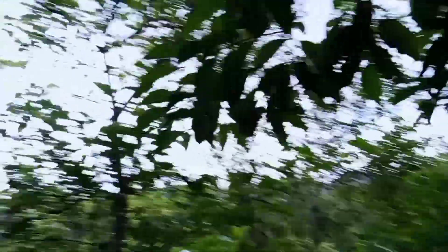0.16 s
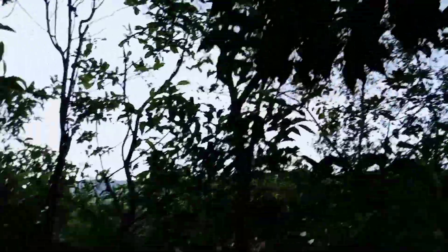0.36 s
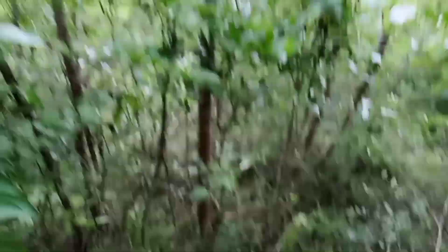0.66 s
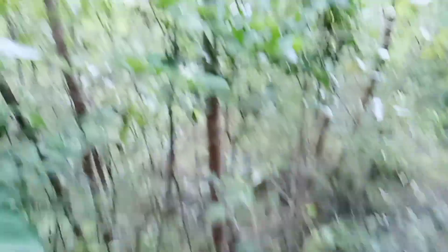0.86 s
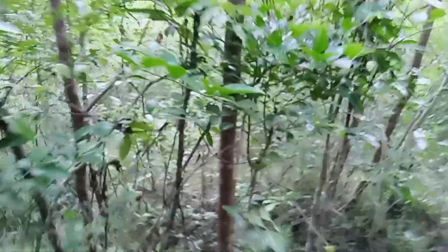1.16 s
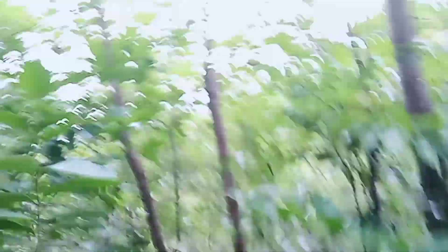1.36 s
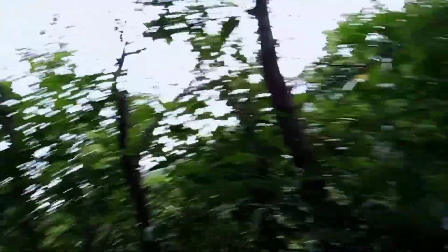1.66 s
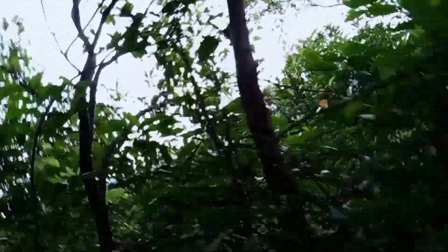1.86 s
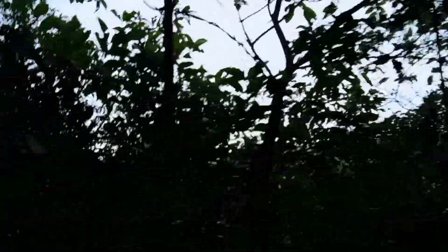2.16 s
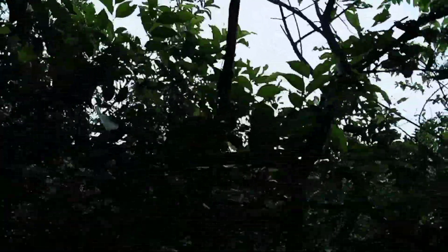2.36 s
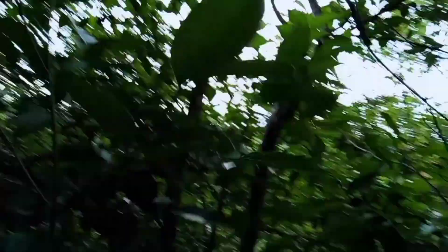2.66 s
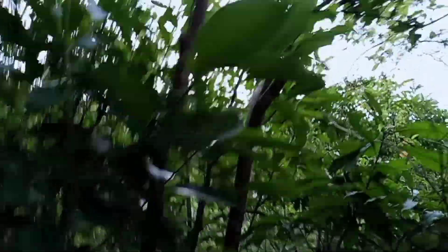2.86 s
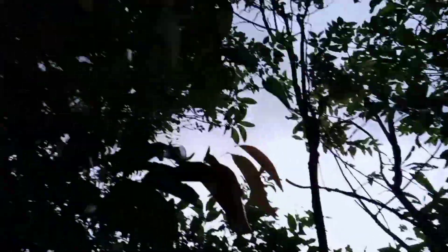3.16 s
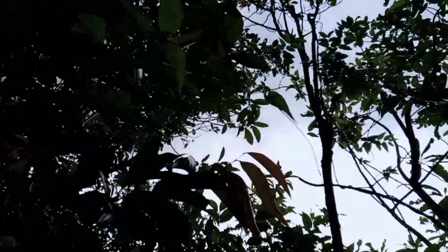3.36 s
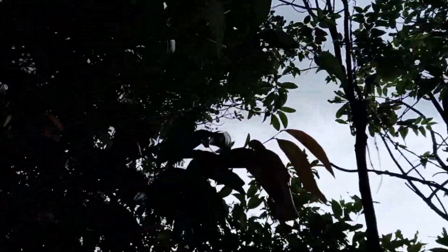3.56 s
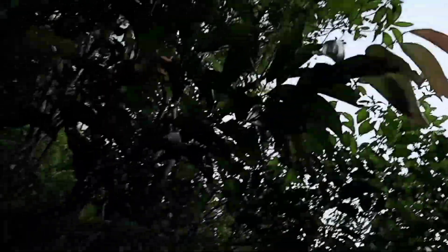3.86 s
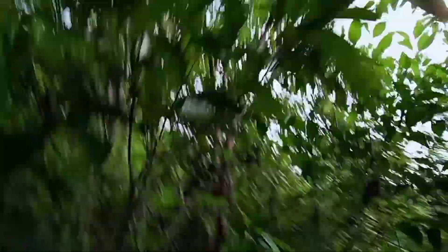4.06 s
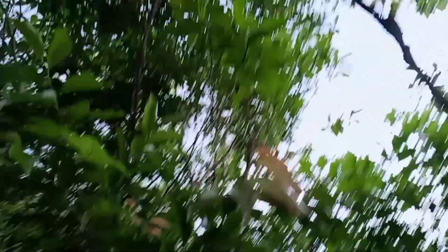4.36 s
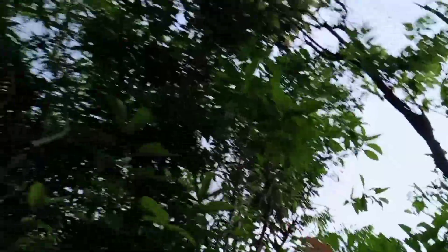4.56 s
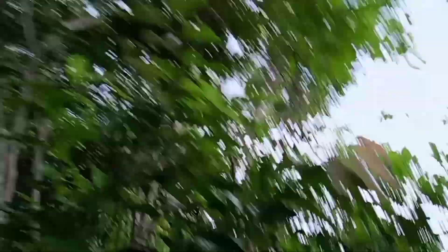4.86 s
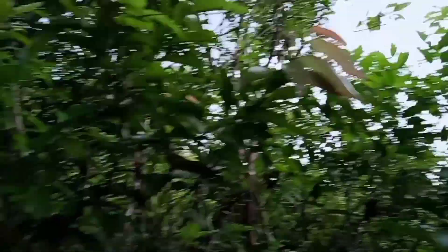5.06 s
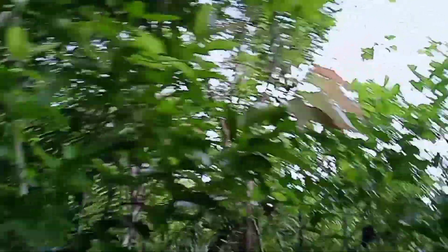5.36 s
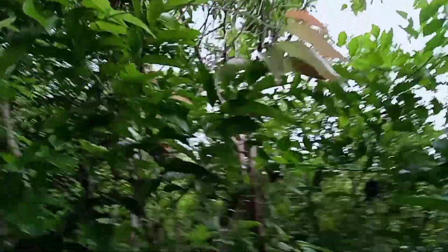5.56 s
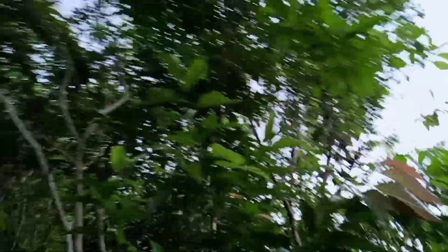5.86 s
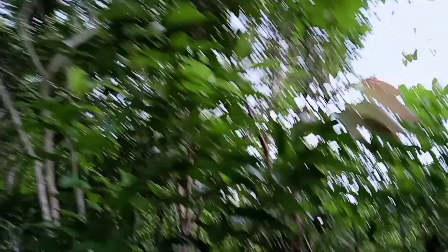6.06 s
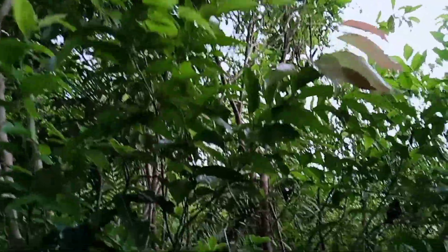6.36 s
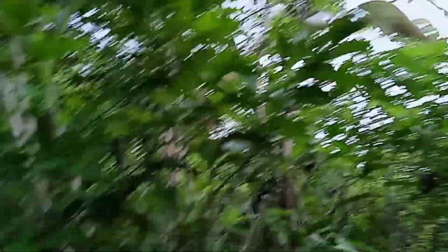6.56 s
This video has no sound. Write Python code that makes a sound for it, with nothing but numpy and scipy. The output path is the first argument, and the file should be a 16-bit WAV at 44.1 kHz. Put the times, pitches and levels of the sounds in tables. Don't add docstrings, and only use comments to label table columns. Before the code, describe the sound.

Outdoors in dense woodland, rough footsteps and brushing arms break twigs and crush dry leaves right beside the microphone, peaking within the first second. The crackle then drops to scattered snaps and faint rustling. A raspy bird calls just after two seconds and again past four, with distant whistles, soft coos and tiny peeps around it. Faint insect buzzing pulses above low, gentle wind.

```python
import sys
import numpy as np
from scipy import signal
from scipy.fft import rfft, irfft, next_fast_len
from scipy.io import wavfile
from scipy.ndimage import uniform_filter1d

SR = 44100
rng = np.random.default_rng(int(sys.argv[2]) if len(sys.argv) > 2 else 0)


def to_linear_factor(level_db):
    exponent = np.asarray(level_db, float) / 20
    return 10 ** exponent


def persist_wave(psi):
    counts = np.round(np.clip(psi, -1, 1) * 32767).astype(np.int16)
    wavfile.write(sys.argv[1], SR, np.atleast_2d(counts).T)


N = 295645


def evened(x):
    return x / np.sqrt(np.mean(x ** 2) + 1e-20)


def read(points, hz):
    f, value = np.transpose(points)
    return np.interp(np.log(hz + 1), np.log(f + 1), value)


def curve(rows):
    s, level_db = np.transpose(rows)
    return np.interp(np.arange(N) / SR, s, level_db)


def add(mix, s, sound):
    part = mix[round(s * SR):][:len(sound)]
    part += sound[:len(part)]


def colour(x, gain):
    size = next_fast_len(len(x), True)
    return irfft(rfft(x, size) * gain(np.fft.rfftfreq(size, 1 / SR)), size)[:len(x)]


def wander(per_s, size=N):
    return evened(colour(rng.standard_normal(size), lambda hz: 1 / (1 + (hz / per_s) ** 2)))


def crackle(size, per_s, spread_db):
    strength = to_linear_factor(spread_db * np.minimum(rng.exponential(1, size), 4))
    happens = rng.random(size) < per_s / SR
    return strength * rng.standard_normal(size) * happens


def mottle(x, patchy_db):
    hz, _, z = signal.stft(x, SR, nperseg=512, noverlap=384)
    chance = rng.standard_normal(z.T.shape).T

    def blurred(bins, frames):
        return evened(uniform_filter1d(uniform_filter1d(chance, size=bins, axis=0), size=frames, axis=1))

    patches = .8 * blurred(3, 14) + .75 * blurred(9, 55)
    fade = 1 + (hz[:, None] / 6000) ** 4
    z = z * to_linear_factor(patchy_db * patches / fade)
    return evened(signal.istft(z, SR, nperseg=512, noverlap=384)[1][:len(x)])


def trunks(x, t60, wet_db, per_s):
    t = np.arange(SR // 2) / SR
    taps = rng.standard_normal(len(t)) * (rng.random(len(t)) < per_s / SR)
    taps *= to_linear_factor(-60 * t / t60) * (t > .004)
    return x + to_linear_factor(wet_db) * signal.fftconvolve(x, taps / np.linalg.norm(taps))[:N]


# (frequency [Hz], level [dB per Hz])
LEAF_COLOUR = [(47, -67), (80, -23), (136, -16), (277, -13), (404, -12.5), (820, -6.5), (980, -8),
               (1120, -4), (1700, -1), (3540, 1), (5280, -16.5), (8600, -20), (10700, -31), (13700, -29.5),
               (16000, -31.5)]


def litter(size, hz, bright_db, lift):
    def tone(f):
        tilt_db = bright_db * np.log2((f + 350) / 2250)
        peak = 1 + lift / (1 + ((f - hz) / (0.48 * hz)) ** 2)
        return to_linear_factor(read(LEAF_COLOUR, f) + tilt_db) * peak

    grains = crackle(size, per_s=14000, spread_db=0.5) * to_linear_factor(2.6 * wander(110, size=size))
    return evened(colour(grains, tone)), tone


def snap(peak_db, hz, bright_db, crunch_db, length):
    size = 8192 if length > .01 else 2048
    t = np.arange(size) / SR
    ring = np.sin(2 * np.pi * hz * t) * np.exp(-t * hz / 1.4)
    ring += 1.2 * np.exp(-t / .00006)
    grains, tone = litter(size, hz, bright_db, lift=1.0)
    settle = (1 - np.exp(-t / 0.00013)) * np.exp(-t / np.clip(length, .004, .08))
    ring = colour(np.roll(ring, 64), lambda f: np.sqrt(tone(f)) / (1 + (270 / (f + 1)) ** 3))
    sound = ring / abs(ring).max() + 0.83 * to_linear_factor(crunch_db) * np.roll(grains * settle, 64)
    return to_linear_factor(peak_db) * sound[:7000]


# (time [s], peak level [dB], ring [Hz], brightness [dB per octave])
TWIGS = [(.047, -21.5, 1570, 1), (.341, -11.5, 1240, -4.5), (0.617, -3.5, 1740, -3.5), (1.107, -6, 2670, 2),
         (1.241, -24, 2620, 7), (0.185, -20.5, 3550, 8.5), (0.544, -23, 3000, 2), (1.3005, -18, 1190, -9),
         (1.392, -4, 2460, 2), (5.630, -29, 3300, 9.5), (5.6645, -27, 4050, 9), (5.917, -37, 2520, 5),
         (1.715, -14.5, 2000, -3.5), (1.7476, -11, 1030, -2.5), (1.8765, -13.5, 2400, 2.5),
         (2.36, -25, 1500, 9), (2.539, -25, 1570, 3), (2.783, -32, 2360, 9), (4.809, -17, 1750, -6),
         (4.819, -25.5, 2670, -11), (5.3038, -17.5, 4120, 0)]
# (time [s], peak level [dB], ring [Hz], brightness [dB per octave])
STALKS = [(0.104, -21, 2800, 3), (0.273, -12, 500, -3.5), (0.384, -21.5, 2520, 11.5),
          (.473, -12, 3030, 1.5), (0.492, -25, 1580, -4), (0.585, -15, 1520, -6.5), (0.737, -13, 1450, 5),
          (0.753, -24, 1850, 16), (0.771, -8.5, 1260, 8), (1.021, -19.5, 2200, 5.5), (1.063, -14, 3420, -1),
          (1.078, -6, 1770, -4.5), (1.292, -18, 1080, -3), (1.327, -20, 1910, -4),
          (1.358, -9.5, 2150, -7.5), (1.501, -13, 1960, 3), (1.841, -27, 2660, 2), (2.437, -16, 1720, 1.5),
          (2.576, -25.5, 3110, -1), (4.514, -13.5, 1500, -1.5), (4.603, -29, 3000, 2),
          (5.685, -31, 2270, -2), (6.611, -35.5, 2370, 4)]
# (time [s], peak level [dB], ring [Hz], brightness [dB per octave])
CRACKS = [
    (.696, -18, 1490, 0),
    (.8375, -4, 1150, 0),
    (.923, -5, 1600, 2),
    (1.4655, -12, 3000, 3),
    (2.228, -21, 2440, 6),
]
# (time [s], peak level [dB], ring [Hz])
LEAF_TICKS = [(.2273, -26, 2930), (.4785, -30, 1400), (.4947, -18, 1590), (.5542, -24, 1890),
              (.6083, -18, 1670), (.703, -23, 1670), (.7553, -12, 1900), (.772, -10, 1220),
              (.787, -16, 910), (.7915, -9, 970), (.833, -31, 1290), (.842, -23, 2600), (.851, -15, 1200),
              (1.0694, -14, 2000), (1.1097, -2.5, 2790), (1.3129, -33, 2280), (1.3615, -15, 1700),
              (1.364, -10.5, 2020), (1.5035, -11, 1960), (1.5771, -19, 2260), (1.6568, -35, 2740),
              (1.752, -9.5, 2280), (1.7876, -32, 1720), (1.8528, -30, 1580), (1.8816, -42, 3100),
              (1.9795, -33, 1220), (2.494, -23.5, 1500), (2.5951, -26.5, 2710), (2.643, -32, 2670),
              (2.7339, -28, 2520), (.928, -15, 1830), (3.2174, -41, 2500), (3.0398, -30, 3100),
              (3.196, -27, 1430), (4.514, -21, 3300), (4.5985, -27, 3420), (4.6138, -25, 3300),
              (4.8159, -26, 2650), (5.0682, -35, 2540), (5.2086, -31.5, 1280), (5.3378, -46, 3500),
              (5.4074, -26, 3600), (5.769, -32, 2310), (5.909, -39, 2400), (6.6983, -28, 2540)]
# (level [dB], decay [s])
SETTLE = [
    (-13, 0.006),
    (-9, 0.017),
    (-11.5, 0.027),
    (-15, 0.004),
]


def breaks():
    out = np.zeros(N)
    leaf_ticks = [(*row, 3.0) for row in LEAF_TICKS]
    for rows, settle in zip([TWIGS, STALKS, CRACKS, leaf_ticks], SETTLE):
        for s, *row in rows:
            add(out, s - 64 / SR, snap(*row, *settle))
    return out


def crunch(level_db, hz, bright_db, half_s):
    t = (np.arange(8192) - 4096) / SR
    grains, _ = litter(8192, hz, bright_db, lift=1.98)
    return to_linear_factor(level_db) * grains * np.exp(-(t / half_s) ** 2)


# (middle [s], rms level [dB], strongest [Hz], brightness [dB per octave], half length [s])
CRUNCHES = [(0.487, -23.5, 1500, -7.5, 0.034), (0.612, -24.5, 1660, -3.5, 0.011),
            (0.789, -12.5, 855, -1.5, 0.016), (0.82, -19, 1500, 5.5, 0.052), (0.841, -13, 990, -4, 0.019),
            (1.074, -30.5, 1770, -6.5, 0.049), (1.111, -24.5, 2700, -8, 0.014),
            (1.773, -29.5, 1920, -2, 0.032), (1.994, -26.5, 1030, -1, 0.016), (2.315, -37, 3720, 4, 0.04),
            (2.451, -22, 1570, -7.5, 0.012), (2.595, -43, 3020, 4, 0.027),
            (3.035, -40.5, 3160, -1.5, 0.039), (3.198, -36.5, 2580, -1, 0.018),
            (3.477, -54, 6960, 5.5, 0.029), (4.275, -56, 7000, 7, 0.026), (2.361, -32.5, 1600, 2.5, 0.0056),
            (2.122, -29.5, 1860, 0.5, 0.0091), (4.512, -31.5, 3500, 0.5, 0.013),
            (6.695, -46, 2600, -9, 0.0043), (3.637, -42.5, 3000, 4, 0.056), (3.752, -38, 1960, 2, 0.023),
            (5.05, -47, 2960, 6, 0.12), (5.396, -44, 2530, 5, 0.08), (5.784, -43, 2630, 3, 0.017),
            (5.825, -40, 3630, 4.5, 0.034), (5.948, -43.5, 3680, 3, 0.03), (6.363, -47, 2900, -3, 0.036)]


def crunches():
    out = np.zeros(N)
    for s, *row in CRUNCHES:
        add(out, s - 4096 / SR, crunch(*row))
    return out


# (time [s], level [dB])
TREAD = [(0, -53.5), (.15, -40), (.45, -36.5), (.69, -39.5), (.8, -20), (.9, -25), (.97, -31), (1.1, -51.5),
         (1.44, -33), (1.6, -39.5), (1.83, -71), (2.41, -41.5), (3.1, -67), (3.86, -52), (4.6, -62),
         (5.2, -50), (5.8, -62), (6.7, -52.5)]
# (time [s], level [dB])
BRUSH = [(0, -43.5), (.3, -46.5), (.45, -34.5), (.69, -46), (.93, -36), (1.1, -49), (1.31, -40),
         (1.57, -39), (1.83, -46), (2.24, -47.5), (2.6, -46.5), (3.19, -46.5), (3.36, -56.5), (3.7, -46.5),
         (4.46, -56.5), (5, -51), (5.75, -47), (6.4, -60)]


def leaves():
    clumps = wander(45)
    shared = evened(crackle(N, per_s=10000, spread_db=0.0))
    ticks = evened(crackle(N, per_s=250, spread_db=1.5))
    tread_db, brush_db = curve(TREAD), curve(BRUSH)
    hiss_db = -64 + 0.29 * (tread_db + 50) + 0.68 * (brush_db + 50)
    near = np.clip((brush_db + 62) / 22, .55, 1)
    layers = [(tread_db, 150, 1334, 0.075), (brush_db, 1500, 4000, 0.37), (hiss_db, 4960, 31000, 5.8)]
    out = np.zeros(N)
    for level_db, low_hz, high_hz, trim_db in layers:
        def leaf_band(hz):
            edges = (1 + (low_hz / (hz + 1)) ** 6) * (1 + (hz / high_hz) ** 6)
            return to_linear_factor(read(LEAF_COLOUR, hz)) / np.sqrt(edges)

        grains = 0.6 * shared + 0.55 * rng.standard_normal(N) + 0.22 * near * ticks
        band = mottle(colour(grains, leaf_band), patchy_db=2.4)
        lumps_db = near * (2.7 * clumps + 1.5 * wander(25))
        out += to_linear_factor(level_db + trim_db + lumps_db) * band
    return out


def note(rows, rasp_hz, flutter_db, husk=0, flutter_hz=30):
    s, *columns = np.transpose(rows)
    t = np.arange(s[0], s[-1], 1 / SR)
    hz, level_db, rough = (np.interp(t, s, c) for c in columns)
    rough = np.clip(rough + husk, 0, 1)

    def beating(per_s):
        return wander(per_s, size=len(t)) + 1j * wander(per_s, size=len(t))

    rasp = beating(rasp_hz) / np.sqrt(2) + husk * beating(5 * rasp_hz)
    level = to_linear_factor(level_db + flutter_db * wander(flutter_hz, size=len(t))) * signal.windows.tukey(len(t), .1)
    voice = (np.sqrt(1 - rough) + np.sqrt(rough) * rasp) * np.exp(2j * np.pi * np.cumsum(hz) / SR)
    return s[0], np.sqrt(2) * level * voice.real


# (time from start [s], pitch [Hz], level [dB], roughness [0-1])
CALL = [
    [(.006, 3250, -32, 0), (.014, 2955, -29.5, 0), (.028, 2473, -20, 0.08), (.045, 2383, -33, 0), (.068, 2300, -25, .3), (.085, 2008, -28.5, 0.04), (.102, 1774, -32, 0.1)],
    [(.016, 2646, -33, 0.3), (.026, 2273, -29, 0.34), (.038, 2073, -26, 0), (.06, 2030, -29.5, .3), (.076, 2040, -33, 0)],
    [(.1, 2345, -40, 0.5), (.126, 2470, -36, 0.1), (.138, 2450, -20.5, 0.37), (.17, 2540, -26.5, 0), (.188, 2430, -25, .4), (.206, 2210, -28.5, 0.26), (.243, 2184, -53, 1.1)],
    [(.11, 2000, -44, 0.6), (.17, 2056, -31, 0.8), (.2, 2000, -30, 0.5), (.225, 1950, -26, .6), (.245, 1730, -36, 0.5)],
    [(.008, 3330, -40, 0.7), (.022, 3200, -39, 0.5), (.036, 3117, -32, 0), (.05, 2900, -56, .8), (.075, 2980, -54, .8)],
]
CALL_STARTS = [
    2.09,
    4.264,
]


def near_bird():
    out = np.zeros(N)
    for start in CALL_STARTS:
        for rows in CALL:
            s, sound = note(rows, rasp_hz=150, flutter_db=2.2, husk=.14, flutter_hz=80)
            add(out, start + s, sound)
    return colour(out, lambda hz: 1 / (1 + (1000 / (hz + 1)) ** 4) / (1 + (hz / 4200) ** 8))


def chirp(peak_db, hz, length=0.036, glide=0, tremble=0.0062, rise=0.69):
    u = np.linspace(0, 1, int(np.clip(length, .01, .09) * SR))
    pitch = hz * (1 + glide * (u - .4) + tremble * wander(68, size=len(u)))
    return to_linear_factor(peak_db) * np.sin(np.pi * u ** rise) ** 2 * np.sin(2 * np.pi * np.cumsum(pitch) / SR)


# (time [s], peak level [dB], pitch [Hz], length [s], glide [share of pitch])
CHIPS = [(2.203, -25.5, 2970, 0.03, 0.0088), (2.896, -38, 3020, 0.037, -0.28),
         (2.96, -35, 3030, 0.029, 0.12), (3.046, -30, 3030, 0.014, -0.092),
         (3.109, -33.5, 3020, 0.025, 0.0024), (3.185, -33, 2810, 0.037, -0.39),
         (3.747, -42, 721, 0.079, 0.42), (4.376, -35, 2970, 0.023, 0.044),
         (4.391, -32.5, 3160, 0.021, -0.05), (3.867, -47.5, 756, 0.04, 0.2),
         (5.152, -44.5, 743, 0.059, -0.26), (5.095, -47, 877, .04, 0.11)]


def chips():
    out = np.zeros(N)
    for s, *row in CHIPS:
        add(out, s - .008, chirp(*row, tremble=0.015))
    return out


def whistle(start, length, first_hz, last_hz, level_db):
    edge_s, edge_db = .02, -10
    s = np.sort([0, edge_s, length / 3, length / 2, length - edge_s, length])
    hz = first_hz + (last_hz - first_hz) * np.sin(np.pi / 2 * (s / length) ** .7)
    swell_db = level_db + edge_db * np.array([1.5, 0, 0, 0, .3, 1.5])
    rows = np.transpose([start + s, hz, swell_db, np.full(len(s), .15)])
    return note(rows, rasp_hz=70, flutter_db=1.2)


# (start [s], length [s], first pitch [Hz], last pitch [Hz], level [dB])
WHISTLES = [(.975, .04, 2190, 2210, -38), (1.015, .05, 2230, 2270, -33), (1.11, .08, 2240, 2230, -47),
            (1.45, .175, 2050, 2225, -31), (3.55, .055, 2330, 2285, -41), (3.58, .18, 2285, 2285, -45),
            (3.617, .041, 2270, 2280, -40), (3.648, .041, 2350, 2330, -42), (3.682, .041, 2290, 2310, -39),
            (3.716, .041, 2290, 2270, -40), (3.79, .11, 2230, 2250, -49), (3.875, .06, 2040, 2070, -48),
            (3.97, .05, 2300, 2330, -47), (3.395, .09, 2600, 2100, -54), (3.75, .08, 2405, 2410, -43),
            (3.83, .05, 1890, 1905, -46), (3.93, .055, 1900, 1880, -45), (3.98, .23, 1900, 2200, -41.5),
            (4.215, .07, 2195, 2192, -45), (5.695, .135, 2310, 2315, -41), (5.83, .12, 2308, 2304, -54),
            (6.075, .215, 1930, 2215, -42), (6.26, .09, 2215, 2200, -50)]


def far_whistles():
    out = np.zeros(N)
    for row in WHISTLES:
        add(out, *whistle(*row))
    return out


# (time [s], peak level [dB], pitch [Hz], length [s])
PEEPS = [(2.632, -53, 7160, 0.039), (3.253, -60, 7120, 0.076), (3.284, -50.5, 7390, 0.053),
         (3.3588, -61, 7080, 0.035), (3.4, -53, 7400, 0.064), (3.478, -42.5, 7810, 0.065),
         (3.872, -55, 7210, 0.028), (4.137, -37.5, 7870, 0.037), (4.226, -41.5, 7880, 0.063),
         (4.456, -63, 7100, 0.035), (4.697, -66, 7060, 0.04), (4.843, -65, 7150, .03),
         (5.045, -54, 7200, .03), (5.684, -38, 7840, 0.041), (6.326, -31, 7870, 0.032),
         (6.442, -31.5, 7850, 0.041)]


def peeps():
    out = np.zeros(N)
    for s, *row in PEEPS:
        add(out, s - .006, chirp(*row, tremble=.004, rise=1))
    return out


# (time [s], peak level [dB], pitch [Hz])
COOS = [(1.713, -32.5, 532), (1.785, -33, 544), (1.874, -37.5, 525), (1.957, -36.5, 519), (2.029, -36, 523),
        (2.094, -40, 520), (2.171, -55, 500), (2.236, -40, 533), (2.278, -38, 517), (2.349, -38, 532),
        (2.781, -41.5, 520), (2.889, -42, 571), (2.98, -41.5, 534), (3.049, -45, 588), (3.118, -44.5, 570),
        (3.194, -41, 544), (3.26, -45, 546), (3.382, -44.5, 572), (3.499, -49, 578), (3.587, -44.5, 522),
        (3.63, -46, 594), (3.93, -47, 583), (3.723, -39.5, 590), (4.026, -47.5, 592), (4.148, -51, 574),
        (5.379, -39, 1023), (5.539, -41.5, 1108), (6.04, -52, 980), (6.45, -42, 1015), (6.659, -43, 960)]


def coos():
    out = np.zeros(N)
    for s, *row in COOS:
        add(out, s - .008, chirp(*row, length=.045, tremble=.06))
    return out


def birds():
    near = to_linear_factor(-1.5) * trunks(near_bird() + to_linear_factor(-1.5) * chips(), t60=.2, wet_db=-6, per_s=1500)
    far = to_linear_factor(-.7) * trunks(far_whistles(), t60=.25, wet_db=-11, per_s=2500)
    high = trunks(peeps(), t60=.08, wet_db=-18, per_s=2500)
    low = to_linear_factor(-5) * trunks(coos(), t60=.3, wet_db=-4, per_s=600)
    return near + far + high + low


# (first throb [s], throbs [count], level [dB], pitch [Hz])
INSECTS = [(.04, 4, -52, 5700), (.48, 3, -52, 5700), (1.15, 3, -53, 5650), (1.765, 6, -53, 5700),
           (2.51, 4, -51, 5720), (2.82, 2, -58, 5850), (3.04, 4, -53, 5750), (3.23, 2, -55, 5850),
           (3.585, 3, -51.5, 5620), (4.03, 4, -53.5, 5680), (4.33, 3, -60, 5880), (4.56, 3, -55, 5680),
           (4.83, 3, -61, 5900), (5.06, 4, -55.5, 5680), (5.41, 3, -60, 5900), (5.64, 3, -53.5, 5650),
           (6.005, 5, -55.5, 5720), (6.04, 5, -57, 5900), (6.41, 4, -59.5, 5850)]


def insects():
    throb_s, half_s = .076, .022
    out, t = np.zeros(N), np.arange(SR // 2) / SR
    for s, count, level_db, mid_hz in INSECTS:
        buzz = colour(rng.standard_normal(len(t)), lambda hz: 1 / (1 + ((hz - mid_hz) / 360) ** 4))
        buzz *= to_linear_factor(2 * wander(120, size=len(t)))
        uneven = to_linear_factor(2 * rng.standard_normal(6))
        throbs = sum(uneven[k] * np.exp(-((t - .04 - k * throb_s) / half_s) ** 2) for k in range(count))
        add(out, s - .04, to_linear_factor(level_db - 3.5) * throbs * evened(buzz))
    return out


def puff(level_db, mid_hz, half_s=0.03, width=0.4):
    swell = np.exp(-((np.arange(8192) - 4096) / SR / half_s) ** 2)
    noise = rng.standard_normal(8192)
    eddy = swell * colour(noise, lambda hz: np.exp(-(np.log((hz + 1) / mid_hz) / width) ** 2))
    return to_linear_factor(level_db) * evened(eddy) * np.sqrt(np.mean(swell ** 2))


# (middle [s], rms level [dB], pitch [Hz])
PUFFS = [(1.79, -47.5, 141), (1.86, -47.5, 133), (2.001, -47, 245), (2.106, -51.5, 178), (2.185, -45, 199),
         (2.292, -51, 200), (2.429, -64, 199), (2.589, -45.5, 170), (2.658, -45, 156), (2.737, -42.5, 145),
         (3.047, -43, 147), (3.192, -55, 121), (3.286, -48, 170), (3.495, -51, 212), (3.66, -44.5, 208),
         (3.759, -46.5, 149), (3.969, -51.5, 130), (4.205, -50.5, 168), (4.315, -52.5, 166),
         (4.538, -43.5, 190), (4.671, -47.5, 146), (4.815, -44.5, 130), (4.947, -43.5, 134),
         (5.081, -45.5, 177), (5.231, -47.5, 134), (5.394, -44, 207), (5.49, -49, 180), (5.649, -47, 168),
         (6.068, -59, 161), (6.417, -45, 181)]


def puffs():
    out = np.zeros(N)
    for s, *row in PUFFS:
        add(out, s - 4096 / SR, puff(*row))
    return out


# (time [s], level [dB])
GUSTS = [(0, -50.5), (.45, -46.5), (.67, -53), (.95, -49), (1.4, -49.5), (1.88, -54), (2.13, -48.5),
         (2.59, -46.5), (2.7, -55), (3.11, -52.5), (3.3, -52), (4.0, -54), (4.72, -54), (5.02, -50.5),
         (5.8, -49), (6.7, -54.5)]
# (frequency [Hz], level [dB per Hz])
WIND_COLOUR = [(15, -33), (25, -19.5), (113, -2.5), (163, 2), (193, -1.5), (226, -1), (362, -12.5),
               (450, -44), (580, -41), (990, -120)]


def wind():
    eddies = np.zeros(N)
    for mid_hz in np.geomspace(40, 330, num=7):
        def region(hz):
            return to_linear_factor(read(WIND_COLOUR, hz)) * np.exp(-(np.log((hz + 1) / mid_hz) / 0.36) ** 2)

        eddies += colour(rng.standard_normal(N), region) * to_linear_factor(3.5 * wander(8))
    eddies = evened(eddies * to_linear_factor(1.5 * wander(9)))
    return to_linear_factor(curve(GUSTS) - 1.0) * eddies


# (frequency [Hz], level [dB per Hz])
AIR_COLOUR = [(180, -3), (300, -2), (425, 8), (584, 11.5), (737, -3), (814, -12), (1190, -9), (1430, 3),
              (3400, 11), (4160, 10.5), (5900, -18), (6620, -14), (15000, -10.5), (16000, -35)]


def forest_hush():
    noise = rng.standard_normal(N)
    hush = colour(noise, lambda hz: to_linear_factor(read(AIR_COLOUR, hz)) / (1 + (250 / (hz + 1)) ** 4))
    return to_linear_factor(-55.5 + 0.65 * wander(5.6)) * mottle(hush, patchy_db=4.5)


def scene():
    walker = trunks(breaks() + crunches(), t60=.12, wet_db=-16, per_s=3000) + leaves()
    air = wind() + puffs() + forest_hush()
    return (walker + birds() + insects() + air)[None]


def low_pass(x):
    return signal.sosfilt(signal.butter(12, 16160, fs=SR, output="sos"), x)


def record(dry):
    edge = signal.firwin(255, 15800, window=("kaiser", 8), fs=SR)
    mix = signal.oaconvolve(np.clip(dry, -.97, .97), edge[None], "same")
    return low_pass(mix)


dry = scene()
out = record(dry)
persist_wave(out)
```